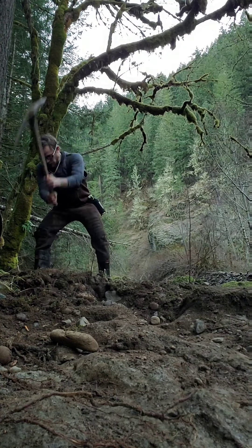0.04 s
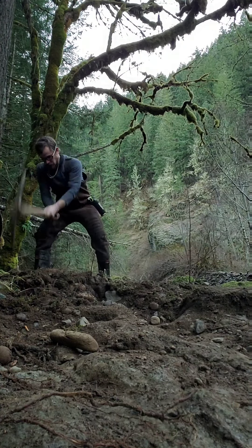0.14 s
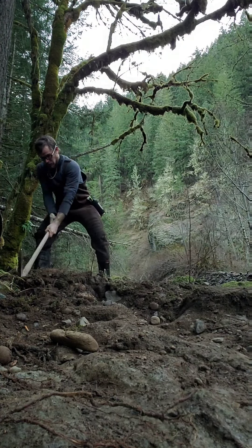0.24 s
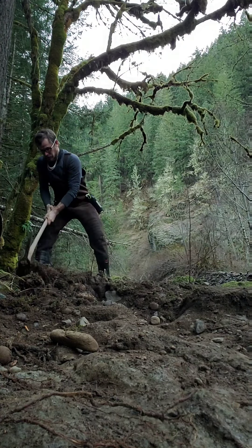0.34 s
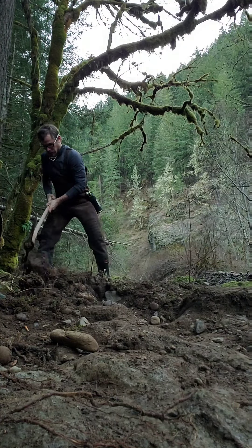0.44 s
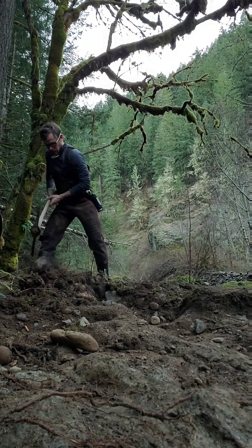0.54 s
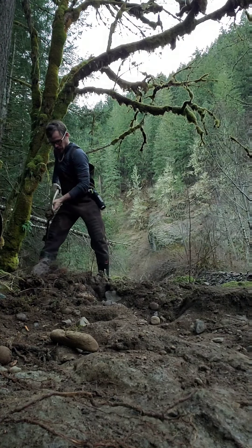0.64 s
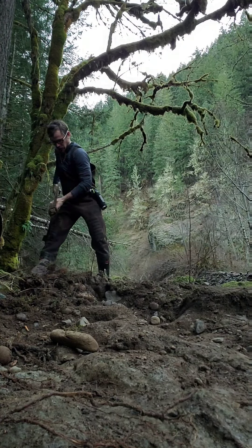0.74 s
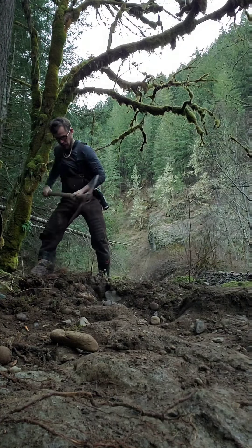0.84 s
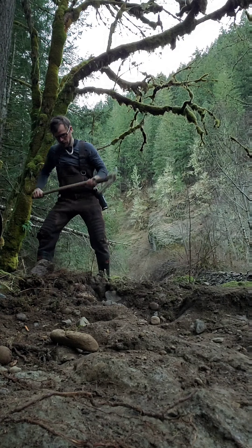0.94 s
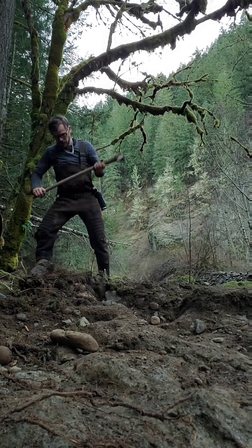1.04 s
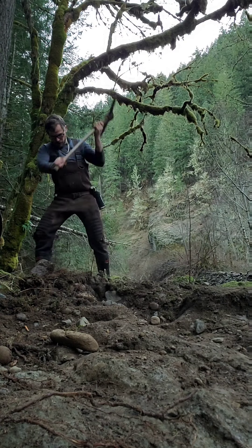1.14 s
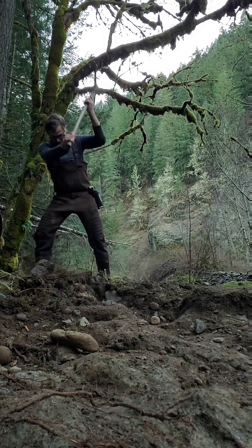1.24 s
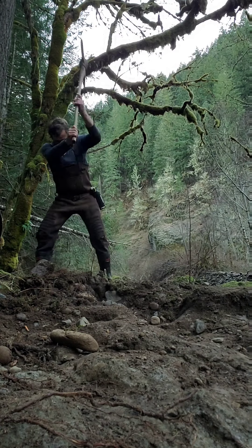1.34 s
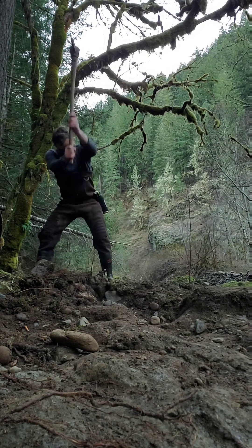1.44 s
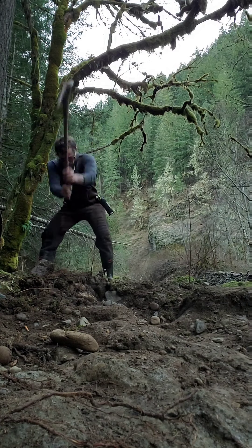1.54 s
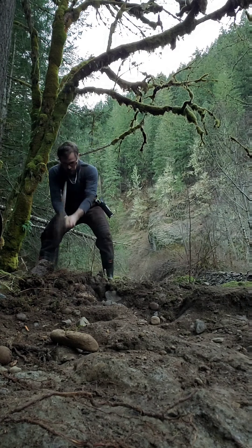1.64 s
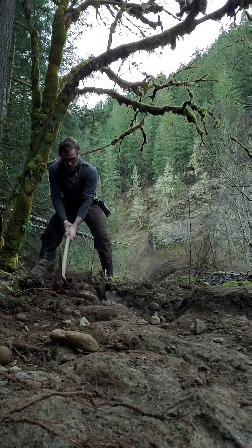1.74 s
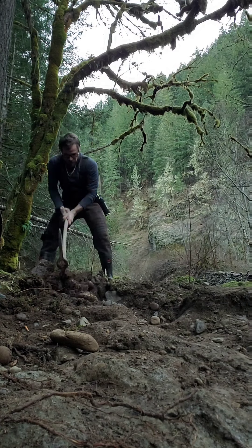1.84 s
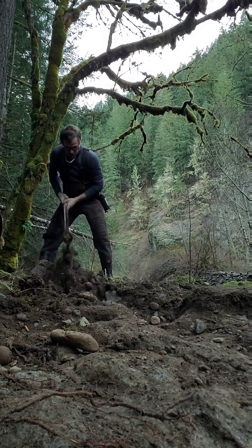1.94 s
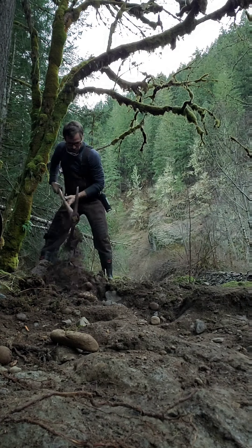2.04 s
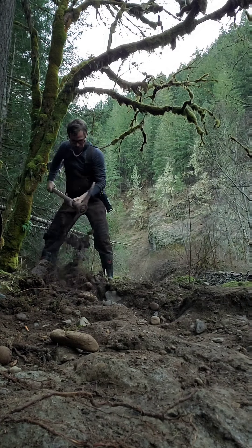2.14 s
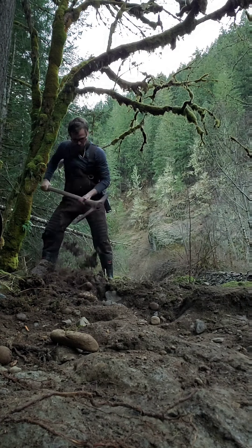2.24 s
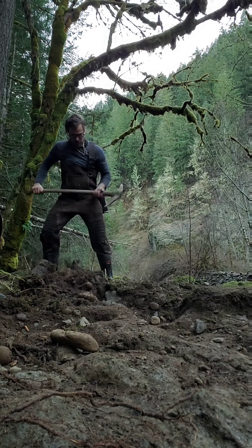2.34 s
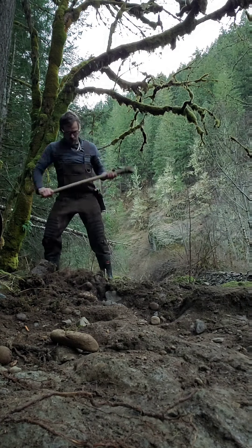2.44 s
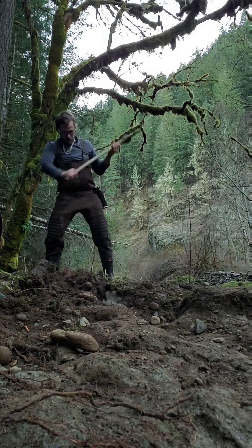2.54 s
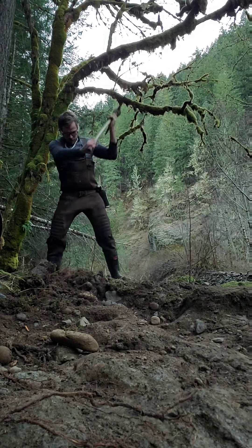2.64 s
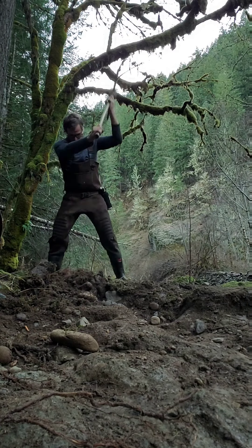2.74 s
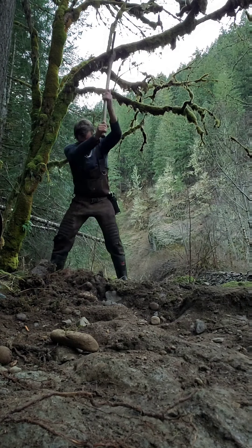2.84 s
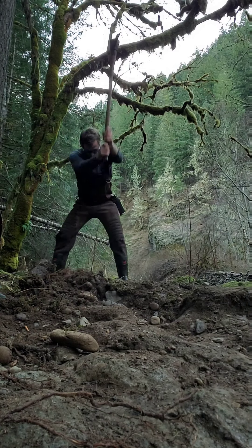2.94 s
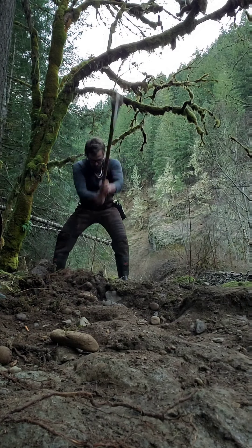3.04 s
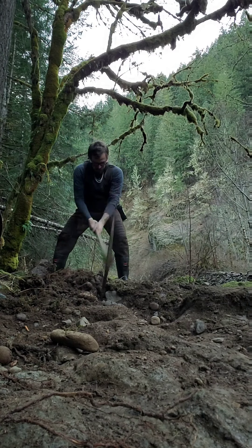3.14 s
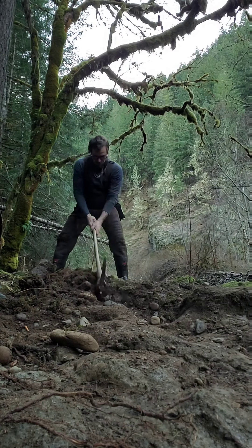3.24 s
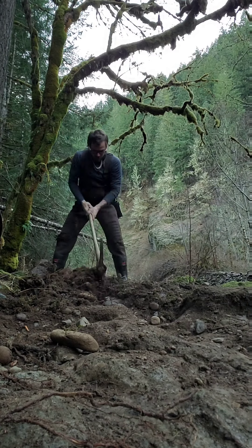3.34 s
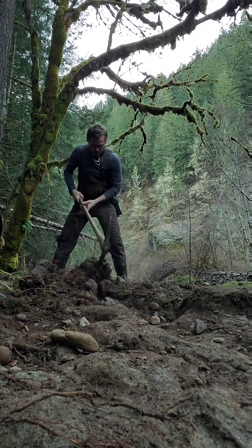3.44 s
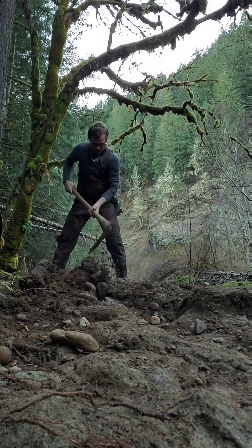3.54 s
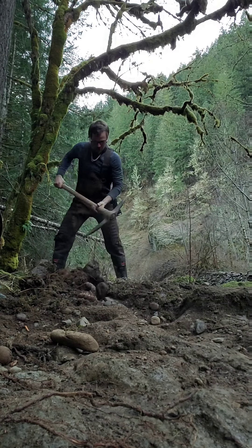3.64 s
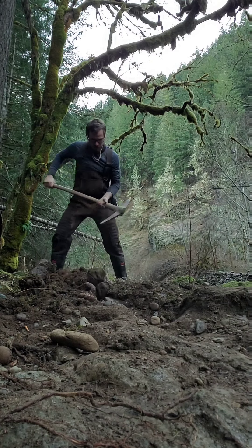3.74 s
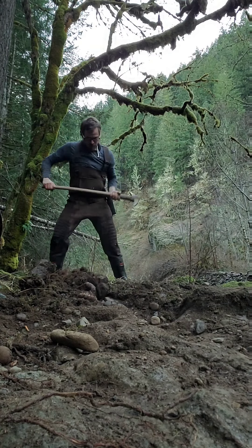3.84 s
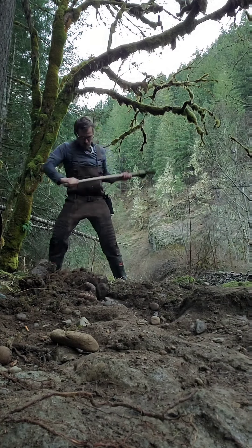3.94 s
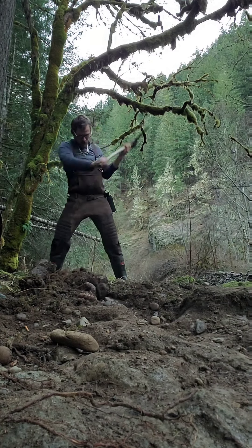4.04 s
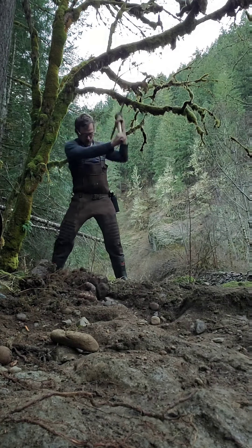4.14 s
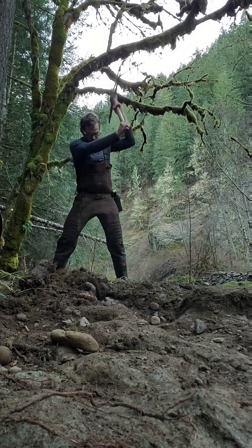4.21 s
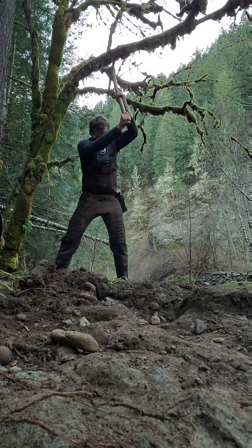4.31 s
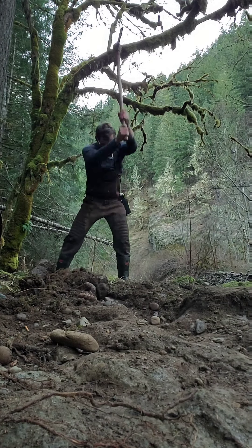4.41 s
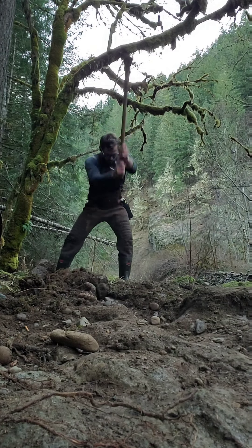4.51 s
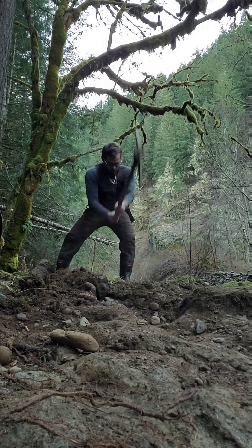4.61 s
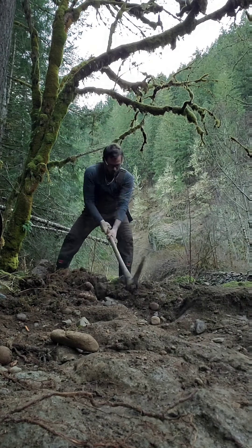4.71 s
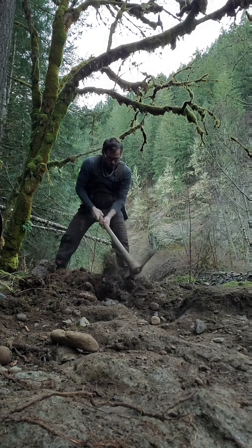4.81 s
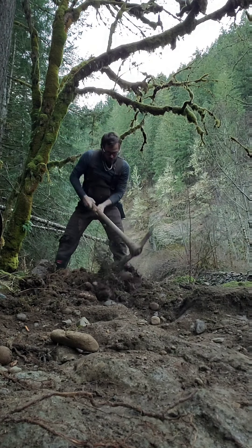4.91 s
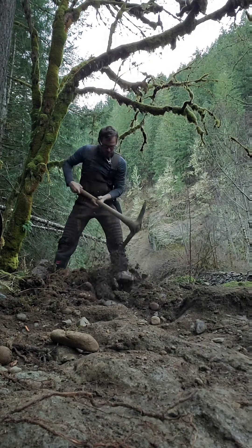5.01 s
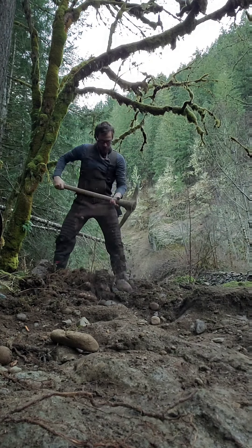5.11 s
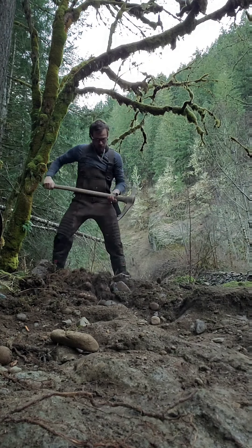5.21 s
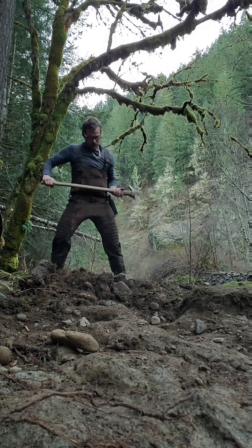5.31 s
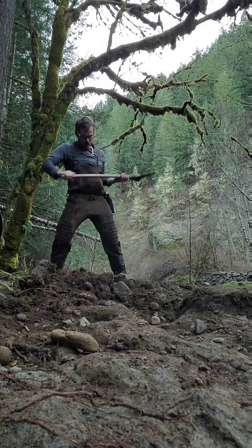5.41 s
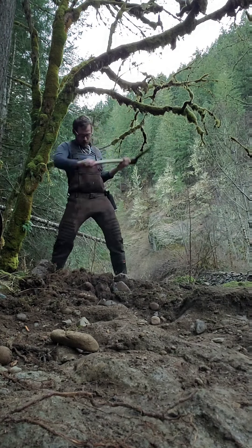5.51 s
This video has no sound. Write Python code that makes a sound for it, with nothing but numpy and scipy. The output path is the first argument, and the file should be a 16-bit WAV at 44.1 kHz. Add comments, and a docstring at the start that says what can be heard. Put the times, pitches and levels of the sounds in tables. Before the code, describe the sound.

Quiet creek water, a low soft rush with slight gurgling and thin hiss, runs throughout, a little stronger at the very start. At 0.23 s a pick-axe hits stony soil: a sharp crunch, a bright damped steel clank and a low earthy thud as it stops, then slumping dirt. A grit click at 0.6 and a dull clod at 0.76 follow. The second blow, at 1.75, is brighter and grittier, with short rasps and clinks to 1.95 and a crumbly clod. A tick falls at 2.4. The third, at 3.23, cracks hard, then scrapes and clinks unevenly until 3.5 among grit ticks; a clod lands at 3.86. The fourth, at 4.75, crunches and grinds, with two small scrapes before 4.9, then pebbles and a faint clod around 5.05-5.2. Thin ringing and sparse tree echoes fade after each blow. The close stereo microphone sits on the ground, treble stronger on the left.

```python
"""Pick-axe digging by a creek

A pick-axe strikes stony soil four times in a forest creek bed, close to a two-port microphone on the ground.
Each blow is noise-grain stone fracture plus ringing steel modes, then damped sine thuds as the soil stops it.
Friction grains drive the modes as the head is levered out; clods thud and grit clicks near the microphone.
Sparse decaying echoes stand for the trees; band-split noise with wandering levels is the creek.
"""
import sys
import numpy as np
from scipy import signal
from scipy.fft import rfft, irfft, next_fast_len
from scipy.io import wavfile
from scipy.ndimage import uniform_filter1d

SR = 44100
rng = np.random.default_rng(int(sys.argv[2]) if len(sys.argv) > 2 else 0)


def persist_wave(psi):
    """Save psi, clipped to +-1, as 16-bit WAV."""
    counts = np.round(np.clip(psi, -1, 1) * 32767).astype(np.int16)
    wavfile.write(sys.argv[1], SR, np.atleast_2d(counts).T)


N = 245637

# creek: spectrum before level scaling [f/Hz, level/dB]
CREEK_SPECTRUM = [(25, -47), (55, -15), (85, -1), (240, -1.5), (500, -7.5), (780, -14), (1020, -15),
                  (1350, -21), (2100, -21), (5000, -29.5), (7000, -31.5), (8800, -38), (13300, -27.5),
                  (15800, -31.5)]
# creek: level over time, dipping after blows and recovering slowly, before RUSH_OFFSET_DB [t/s, level/dB]
CREEK_LEVEL = [(0.0, -39.5), (0.09, -39.5), (0.34, -45), (0.91, -46.5), (1.78, -44), (2.47, -45.5),
               (3.24, -42.5), (3.47, -47), (4.03, -48), (4.92, -44.5), (5.57, -46.5)]
RUSH_OFFSET_DB, GURGLE_DB, HISS_FLICKER_DB = 0.5, 1.1, 0.58

# ports: sound from all round [f/Hz, side minus mid/dB]
AMBIENT_WIDTH = [(60, -14), (130, -39), (290, -15.5), (600, -7.5), (1300, 1.5), (15000, 0)]
# ports: sound from the digging spot [f/Hz, side minus mid/dB]
SPOT_WIDTH = [(60, -25), (290, -6), (640, -16), (1400, 3.5), (3100, -6.5), (6800, -4), (15000, -8)]
# ports: sensitivity [f/Hz, left minus right/dB]
PORT_BALANCE = [(100, -0.3), (380, -0.5), (700, -4.5), (1300, -5.5), (2400, -3.5), (4400, -2.5), (7300, 1),
                (8500, 8.5), (11000, 7), (13000, 20.5), (15000, 14)]
TOP_HZ, CEILING = 15750, 0.7  # CEILING in full-scale units

# steel head: modes, before the contact point favours some [f/Hz, level/dB]
HEAD_MODES = [(1178, -6), (2040, 4.5), (2214, 1.5), (2450, 4), (2941, -22), (3283, 7), (3550, 0), (3865, 2),
              (4230, -18), (5395, 17), (6650, -17), (7120, -4), (10350, -9), (11360, -15), (12700, -26),
              (14980, -17)]
# breaking stone: spectrum before tilt [f/Hz, level/dB]
STONE_SPECTRUM = [(150, -15), (500, 9.5), (900, -7.5), (1400, -4), (1900, 1.5), (2400, 3), (2800, -5.5),
                  (3700, -2), (4800, -5), (7000, -7), (8000, -11), (9500, -14), (11300, -7), (15500, -16)]
# crumbling soil: spectrum for a 450 Hz thud, shifted with thud pitch [f/Hz, level/dB]
SOIL_SPECTRUM = [(25, 9), (70, -4), (150, -16), (280, -10), (550, -5), (900, -10), (1600, -28),
                 (4000, -37.5)]
# echoes off trunks and banks: spectrum [f/Hz, level/dB]
FOREST_SPECTRUM = [(60, -14), (400, -14), (1200, -1), (2400, -1), (3600, 1), (5500, -9), (9000, -3),
                   (16000, -7)]

# blows [t/s, strength/dB, brightness/(dB/octave), stone pitch f/Hz, soil pitch f/Hz,
#   ring focus f/Hz: first stone, second stone, grinding; grinding length/s,
#   level/dB re strength: graze, tip, first ring, second stone, shoved soil, lingering ring]
BLOWS = [(.229, 4.8, -1.5, 3900, 532, 5395, 2450, 5395, 0.036, -32, -1.5, 0.5, -4.5, -4.5, -17),
         (1.751, 1.4, 4.5, 3180, 460, 2214, 3283, 5395, 0.023, -18, 0.5, -15, 1, 3, -24),
         (3.229, 5.2, 2, 3600, 289, 2214, 3865, 3700, 0.016, -13, 1, -2.5, 0, -5, -27),
         (4.749, 5.4, 1, 2970, 560, 2450, 1178, 4270, 0.043, -12, -7.5, -2, -4.5, -5, -23)]
# crunch and grind levels re strength; ring levels re their own crunch, except GRIND_RING_DB re strength
GRAZE_LEAD_S, GRAZE_S = 0.0038, 0.006  # parts loose grit on top
TIP_S, TIP_HZ, TIP_TILT_DB_PER_OCT = 0.0042, 7020, 2  # bright bite; tilt adds to blow brightness
TIP_RING_DB, TIP_RING_HZ, TIP_T60_S = -10.5, 10350, 0.032
CRACK_S, CRACK_T60_S = 0.0037, 0.071  # first stone
SECOND_LAG_S, SECOND_S, SECOND_TILT_DB_PER_OCT = 0.005, 0.012, -1  # stone beneath
SECOND_RING_DB, SECOND_T60_S = -0.5, 0.022
SETTLE_LAG_S, SETTLE_DB = 0.014, -9.5  # fragments grind past the blade
SETTLE_HZ, SETTLE_TILT_DB_PER_OCT = 3540, -1
GRIND_RING_DB, GRIND_T60_S = -19.5, 0.15  # grinding keeps the head ringing
LINGER_HZ, LINGER_T60_S = 2470, 0.9  # free arm of the head
PUSH_LAG_S, PUSH_T60_S, PUSH_CRUMBLE_DB = 0.002, 0.085, 10.5  # soil shoved aside

# head comes to rest [t/s, jolt against stone level/dB, thud level/dB, thud f/Hz, slumping earth level/dB]
STOPS = [(.2546, -18, 8.5, 312, 4.5), (1.7705, 4, 3.5, 322, 2.5), (3.2433, -4.5, -3.5, 727, -5),
         (4.8015, -5.5, -2, 643, -5.5)]
JOLT_S, JOLT_HZ, JOLT_TILT_DB_PER_OCT = 0.005, 3280, -5.5
JOLT_RING_DB, JOLT_RING_HZ, JOLT_T60_S = -6.5, 2450, 0.042  # level re jolt
STOP_T60_S, STOP_CRUMBLE_DB = 0.019, -6.5
SLUMP_LAG_S, SLUMP_HZ, SLUMP_T60_S, SLUMP_CRUMBLE_DB = 0.00401, 430, 0.052, 5

# grit landing near the microphone [t/s, energy level/dB, brightness/(dB/octave)]
GRIT_TICKS = [(0.608, -21.5, 5), (2.375, -22.5, 0), (3.409, -14, 12), (3.4905, -22, 14), (5.047, -19.5, 11),
              (5.2052, -17.5, 7.5)]
# clods dropping [t/s, energy level/dB, pitch f/Hz, T60/s, crumble level re body/dB]
CLODS = [(.762, -12, 714, .03, -3), (1.938, -7.5, 730, 0.075, 5), (3.8602, -5.5, 495, 0.019, -3.5),
         (5.1895, -20.5, 765, .014, -3)]
# head slipping over stone [t/s, length/s, rasp level/dB, ring level/dB, ring f/Hz, release clink level/dB]
SCRAPES = [(1.842, .018, -12, -18, 5400, -18), (1.885, 0.024, -11.5, -17, 5400, -17),
           (1.927, 0.026, -11.5, -12.5, 5670, -12.5), (3.256, 0.033, -18, -11, 3550, -12),
           (3.313, 0.031, -15, -22, 3550, -21), (3.369, 0.012, -13, -16, 5400, -7.5),
           (3.395, 0.033, -24, -20, 4230, -30), (3.436, 0.019, -11.5, -22, 7120, -19),
           (3.48, 0.023, -12, -26, 5400, -12), (4.836, 0.013, -24, -26, 3865, -16),
           (4.866, 0.017, -13.5, -15, 5400, -21)]
SCRAPE_TILT_DB_PER_OCT, SING_T60_S = -2, 0.053  # dragging excites a high mode
CLINK_HZ, CLINK_T60_S, RELEASE_S = 2330, 0.093, 0.0024  # letting go excites the low ones


def undb(db):
    """Decibels to amplitude gain."""
    return 10 ** (np.asarray(db) / 20)


def unit(x):
    """Scale to unit energy, averaged over channels."""
    return x / np.sqrt(np.mean(np.sum(x ** 2, axis=-1)))


def at(points, hz):
    """Interpolate a (Hz, dB) spectrum on a log-frequency axis."""
    f, db = np.transpose(points)
    return np.interp(np.log(np.maximum(hz, 1)), np.log(f), db)


def colour(x, shape):
    """Minimum-phase filter, gain shape(Hz) in dB, by cepstral folding."""
    n = next_fast_len(2 * x.shape[-1], True)
    n += n % 2
    cepstrum = irfft(np.log(undb(shape(np.fft.rfftfreq(n, 1 / SR)))))
    cepstrum[1:n // 2] *= 2
    cepstrum[n // 2 + 1:] = 0
    response = np.exp(rfft(cepstrum))
    return irfft(rfft(x, n) * response)[..., :x.shape[-1]]


def tilt(hz, slope_db_per_oct):
    """Treble tilt in dB about 3 kHz, constant below 1 kHz."""
    return slope_db_per_oct * np.log2(np.maximum(hz, 1000) / 3000)


def add(out, t_s, x):
    """Mix x into out from t_s."""
    i = int(t_s * SR)
    out[:, i:i + x.shape[-1]] += x[..., :N - i]


def clock():
    """Time axis of one short event, a third of a second."""
    return np.arange(SR // 3) / SR


def spread(mid, side, width):
    """Mid and side to two ports: alike in the bass, less so in the treble."""
    side = colour(side, lambda f: at(width, f))
    return np.array([mid + side, mid - side])


def walk(rate_hz):
    """Random levels held 1 / rate_hz, smoothed twice; standard deviation near 1."""
    k = int(SR / rate_hz)
    steps = np.repeat(rng.standard_normal(N // k + 1), k)
    return 1.54 * uniform_filter1d(uniform_filter1d(steps, k), k)[:N]


def creek(gurgle_db, hiss_flicker_db):
    """Running water: low bands gurgle independently, the far hiss stays smoother."""
    n = 2 ** 18
    hz = np.fft.rfftfreq(n, 1 / SR)
    noise = rfft(rng.standard_normal((2, n)))
    water = 0
    edges_hz = [0, 100, 200, 400, 800, 1600, 4000, SR]
    for lo, hi in zip(edges_hz, edges_hz[1:]):
        depth_db = gurgle_db if lo < 800 else hiss_flicker_db
        band = irfft(noise * ((hz >= lo) & (hz < hi)))[:, :N]
        water = water + band * undb(depth_db * walk(16))
    water = colour(spread(*water, AMBIENT_WIDTH), lambda f: at(CREEK_SPECTRUM, f))
    level_db = np.interp(np.arange(N) / SR, *np.transpose(CREEK_LEVEL))
    return water / np.std(water.mean(axis=0)) * undb(RUSH_OFFSET_DB + level_db)


def grains(envelope, spread_db, width=SPOT_WIDTH):
    """Tiny fractures: noise under an envelope, log-normal size redrawn every 10 samples."""
    n = len(envelope)
    size = np.repeat(undb(spread_db * rng.standard_normal(n // 10 + 1)), 10)[:n]
    mid_side = envelope * size * rng.standard_normal((2, n))
    return spread(*mid_side, width)


def stone_on_steel(hz, tilt_db_per_oct, bump_db=6, bump_hz=140):
    """Breaking-stone spectrum in dB, lifted wherever the head resonates."""
    off_mode_hz = np.min(np.abs(hz - np.array(HEAD_MODES)[:, :1]), axis=0)
    lift_db = bump_db / (1 + (off_mode_hz / bump_hz) ** 2)
    return at(STONE_SPECTRUM, hz) + tilt(hz, tilt_db_per_oct) + lift_db


def crunch(db, length_s, stone_hz, tilt_db_per_oct):
    """Steel crushes stone: a grain burst with a 7 dB peak at the stone's pitch."""
    def shape(f):
        pitch_db = 7 / (1 + ((f - stone_hz) / 300) ** 2)
        return stone_on_steel(f, tilt_db_per_oct) + pitch_db

    cracks = grains(np.exp(-(clock() / length_s) ** 1.3), spread_db=4.5)
    return undb(db) * unit(colour(cracks, shape))


def head_ring(focus_hz, t60_s, focus_db=12, treble_damping=0.17, split=0.0094, twin_db=-7):
    """Contact point favours modes near focus_hz; soil grip sets T60 (at 2.5 kHz), high modes die first."""
    t = clock()
    hz, db = np.transpose(HEAD_MODES)[:, :, None]
    db = db - focus_db * np.sqrt(np.abs(np.log2(hz / focus_hz)) / 0.5)
    decay = undb(db - 60 * t / t60_s * (hz / 2500) ** treble_damping)
    # two arms of the head: each mode a beating pair
    main = np.exp(2j * np.pi * hz * t)
    twin = undb(twin_db) * np.exp(2j * np.pi * hz * (1 + split) * t)
    modes = decay * (main + twin)
    # neighbours start in opposite directions
    polarity = (-1) ** np.arange(len(hz))[:, None]
    # high modes reach the ports out of step
    skew_rad = np.minimum(hz / 10000, 0.7)
    return np.array([np.sum(polarity * modes * np.exp(1j * side * skew_rad), axis=0).imag
                     for side in (1, -1)])


def clang(db, focus_hz, t60_s):
    """A contact kicks the head into ringing."""
    return undb(db) * unit(head_ring(focus_hz, t60_s))


def rubbed(slips, focus_hz, t60_s, focus_db=18):
    """Friction grains keep the head ringing: grains convolved with its ring."""
    ringing = signal.fftconvolve(slips, head_ring(focus_hz, t60_s, focus_db), axes=1)
    return unit(ringing[:, :slips.shape[1]])


def linger(db):
    """Arm of the head left in the air sings on as one thin tone, faded out by the event's end."""
    t = clock()
    fade = 1 - (t / t[-1]) ** 10
    tone = np.sin(2 * np.pi * LINGER_HZ * t) * undb(-60 * t / LINGER_T60_S) * fade
    return undb(db) * unit(tone)


def thud(db, hz, t60_s, crumble_db):
    """A few heavily damped cycles of packed earth, soil crumbling round them."""
    t = clock()
    onset = 1 - np.exp(-t / 0.00045)
    body = -np.sin(2 * np.pi * hz * t) * undb(-60 * t / t60_s) * onset
    crumble = grains(np.exp(-t / (0.24 * t60_s)), spread_db=5)
    crumble = colour(crumble, lambda f: at(SOIL_SPECTRUM, f * 450 / hz))
    return undb(db) * unit(unit(body) + undb(crumble_db) * unit(crumble))


def blows():
    """The pick grazes grit, bites, breaks two stones and grinds on through soil."""
    out = np.zeros((2, N))
    for (t_s, db, bright, stone_hz, soil_hz, first_hz, second_hz, grind_hz, grind_s,
         graze_db, tip_db, ring_db, second_db, push_db, linger_db) in BLOWS:
        add(out, t_s - GRAZE_LEAD_S, crunch(db + graze_db, GRAZE_S, stone_hz, bright))

        add(out, t_s, crunch(db + tip_db, TIP_S, TIP_HZ, bright + TIP_TILT_DB_PER_OCT))
        add(out, t_s, clang(db + tip_db + TIP_RING_DB, TIP_RING_HZ, TIP_T60_S))

        add(out, t_s, crunch(db, CRACK_S, stone_hz, bright))
        add(out, t_s, clang(db + ring_db, first_hz, CRACK_T60_S))
        add(out, t_s, linger(db + linger_db))
        add(out, t_s + PUSH_LAG_S, thud(db + push_db, soil_hz, PUSH_T60_S, PUSH_CRUMBLE_DB))

        second_t_s = t_s + SECOND_LAG_S
        add(out, second_t_s, crunch(db + second_db, SECOND_S, stone_hz, bright + SECOND_TILT_DB_PER_OCT))
        add(out, second_t_s, clang(db + second_db + SECOND_RING_DB, second_hz, SECOND_T60_S))

        settle_t_s = t_s + SETTLE_LAG_S
        slips = grains(np.exp(-clock() / grind_s), spread_db=4)
        grinding = rubbed(slips, grind_hz, GRIND_T60_S, focus_db=44)
        add(out, settle_t_s, crunch(db + SETTLE_DB, grind_s, SETTLE_HZ, SETTLE_TILT_DB_PER_OCT))
        add(out, settle_t_s, undb(db + GRIND_RING_DB) * grinding)
    return out


def forest(x, wet_db, t60_s):
    """Trunks and banks throw back many faint echoes: convolution with decaying grains."""
    t = np.arange(SR) / SR
    envelope = undb(-60 * t / t60_s) * (1 - np.exp(-t / 0.0055))
    echoes = unit(grains(envelope, spread_db=6.5, width=AMBIENT_WIDTH))
    echoes = colour(echoes, lambda f: at(FOREST_SPECTRUM, f))
    return undb(wet_db) * signal.fftconvolve(x, echoes, axes=1)[:, :N]


def stops():
    """The buried head jolts to a halt with a thud; earth slumps round it."""
    out = np.zeros((2, N))
    for t_s, jolt_db, thud_db, thud_hz, slump_db in STOPS:
        add(out, t_s, crunch(jolt_db, JOLT_S, JOLT_HZ, JOLT_TILT_DB_PER_OCT))
        add(out, t_s, clang(jolt_db + JOLT_RING_DB, JOLT_RING_HZ, JOLT_T60_S))
        add(out, t_s, thud(thud_db, thud_hz, STOP_T60_S, STOP_CRUMBLE_DB))
        add(out, t_s + SLUMP_LAG_S, thud(slump_db, SLUMP_HZ, SLUMP_T60_S, SLUMP_CRUMBLE_DB))
    return out


def ticks():
    """Thrown grit clicks on bare rock: short stone-coloured grain bursts."""
    out, t = np.zeros((2, N)), clock()
    for t_s, db, bright in GRIT_TICKS:
        chips = grains(np.exp(-t / 0.004), spread_db=4)
        chips = colour(chips, lambda f: at(STONE_SPECTRUM, f) + tilt(f, bright))
        add(out, t_s, undb(db) * unit(chips))
    return out


def clods():
    """Lumps of earth land softly between the blows."""
    out = np.zeros((2, N))
    for t_s, db, hz, t60_s, crumble_db in CLODS:
        add(out, t_s, thud(db, hz, t60_s, crumble_db))
    return out


def scrapes():
    """Friction builds and the head sings, until the stone lets go with a clink."""
    out, t = np.zeros((2, N)), clock()
    for t_s, length_s, rasp_db, sing_db, sing_hz, clink_db in SCRAPES:
        drag = (t / length_s) ** 0.41 * np.exp(-(t / length_s) ** 3)
        slips = grains(drag, spread_db=7.0)
        rasp = colour(slips, lambda f: stone_on_steel(f, SCRAPE_TILT_DB_PER_OCT))
        add(out, t_s, undb(rasp_db) * unit(rasp))
        add(out, t_s, undb(sing_db) * rubbed(slips, sing_hz, SING_T60_S, focus_db=26))
        release = grains(np.exp(-t / RELEASE_S), spread_db=3.0)
        add(out, t_s + length_s, undb(clink_db) * rubbed(release, CLINK_HZ, CLINK_T60_S))
    return out


def scene():
    """Digging, its echo among the trees, grit and creek."""
    # a small patch of ground radiates little deep bass
    high_pass = signal.butter(4, 70, "high", fs=SR, output="sos")
    digging = signal.sosfilt(high_pass, blows() + stops() + clods() + scrapes())
    echo = forest(digging, wet_db=-16, t60_s=0.98)
    return digging + echo + ticks() + creek(GURGLE_DB, HISS_FLICKER_DB)


def record(dry):
    """Left port hears more treble, right more middle; loudest peaks rounded, top cut."""
    def port(x, side):
        return colour(x, lambda f: -10 * np.log10((1 + undb(-2 * side * at(PORT_BALANCE, f))) / 2))

    ports = np.array([port(x, side) for x, side in zip(dry, (1, -1))])
    rounded = CEILING * np.tanh(ports / CEILING)
    low_pass = signal.ellip(10, 0.2, 70, TOP_HZ, fs=SR, output="sos")
    return signal.sosfilt(low_pass, rounded)


dry = scene()
out = record(dry)
persist_wave(out)
```